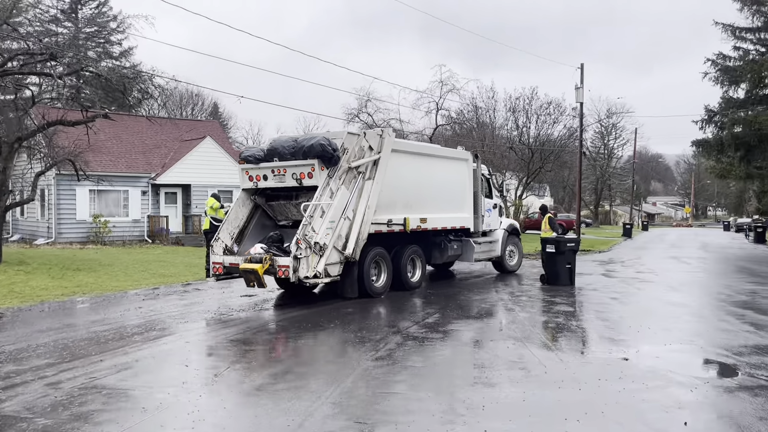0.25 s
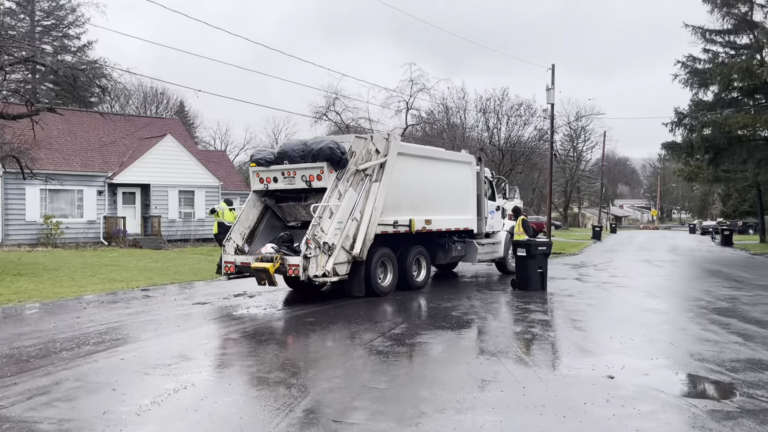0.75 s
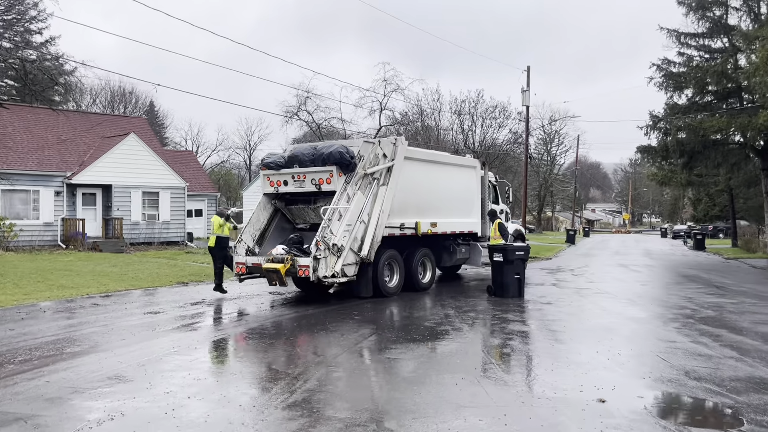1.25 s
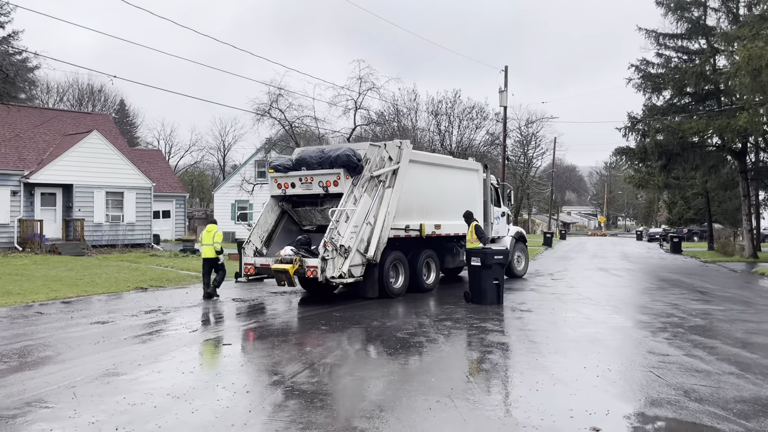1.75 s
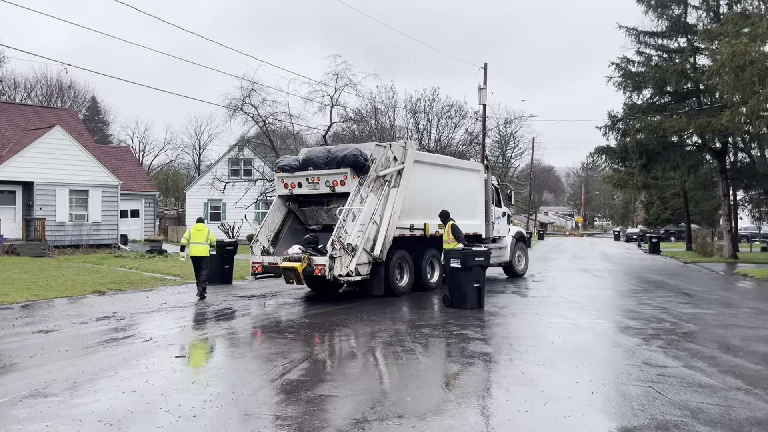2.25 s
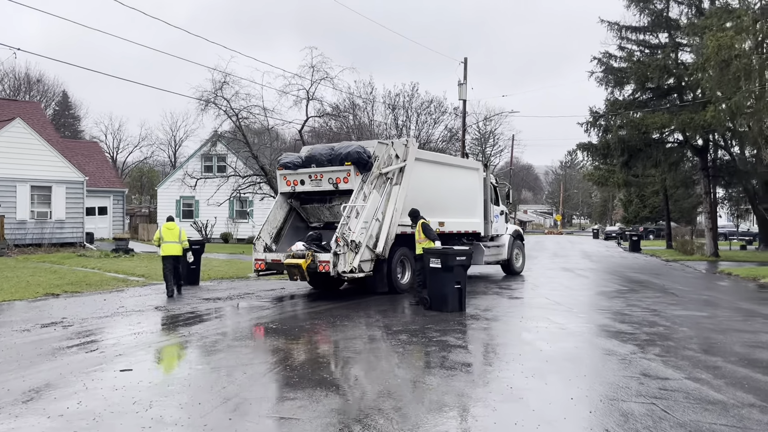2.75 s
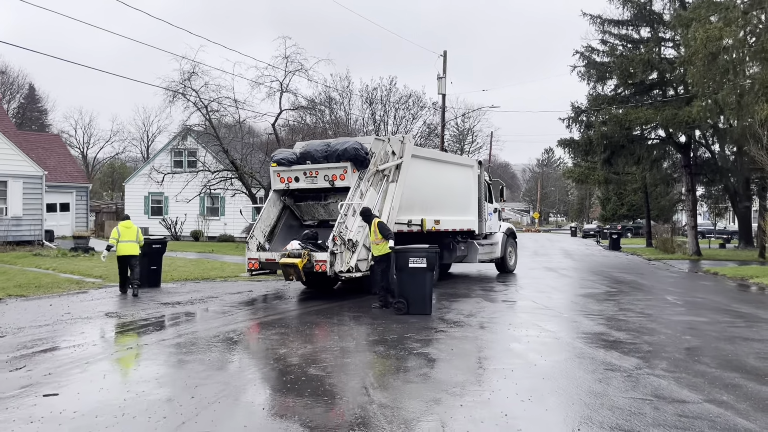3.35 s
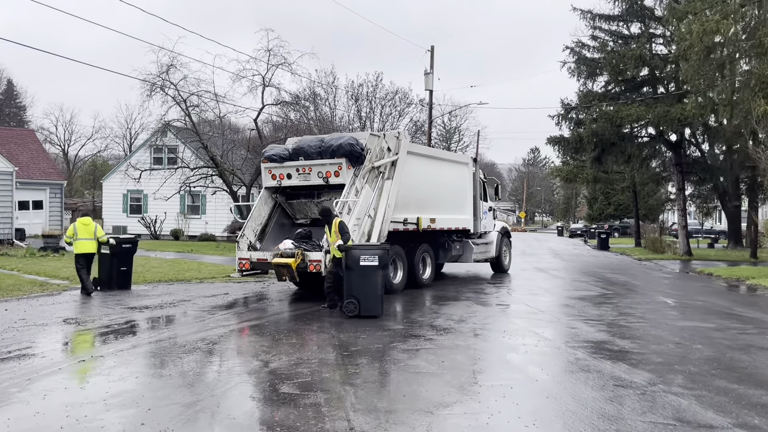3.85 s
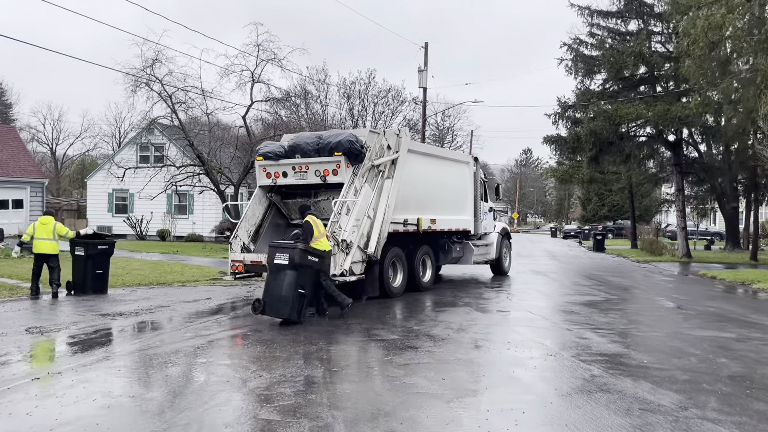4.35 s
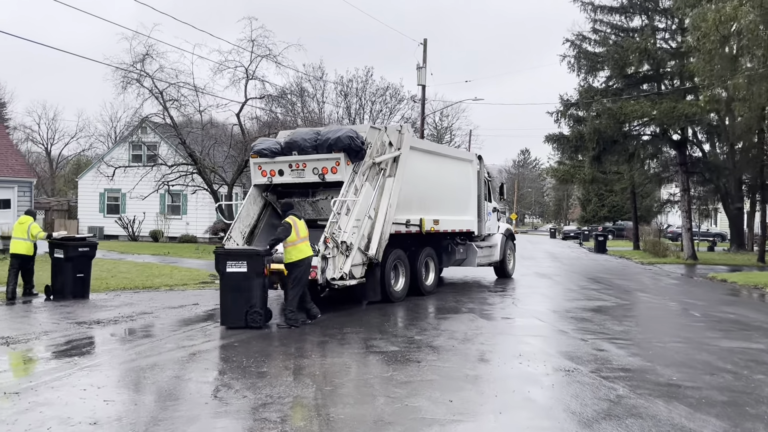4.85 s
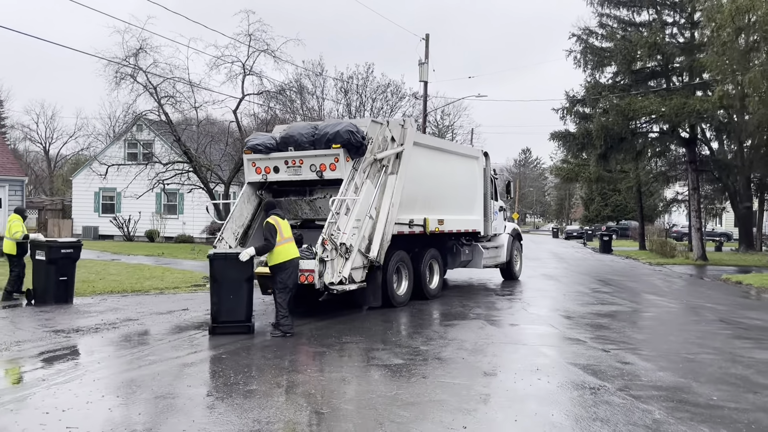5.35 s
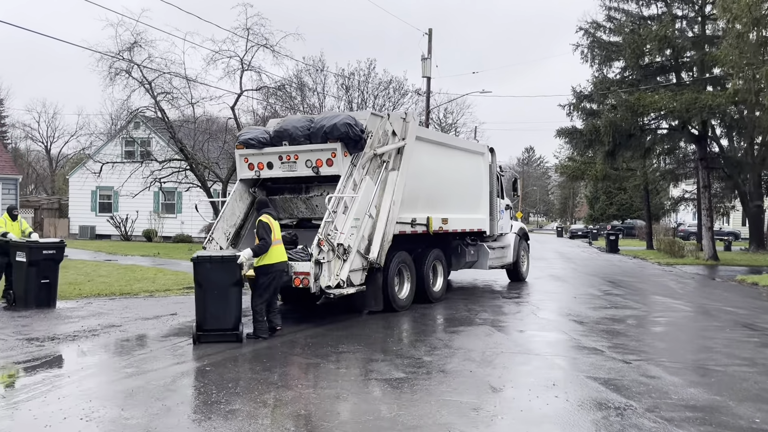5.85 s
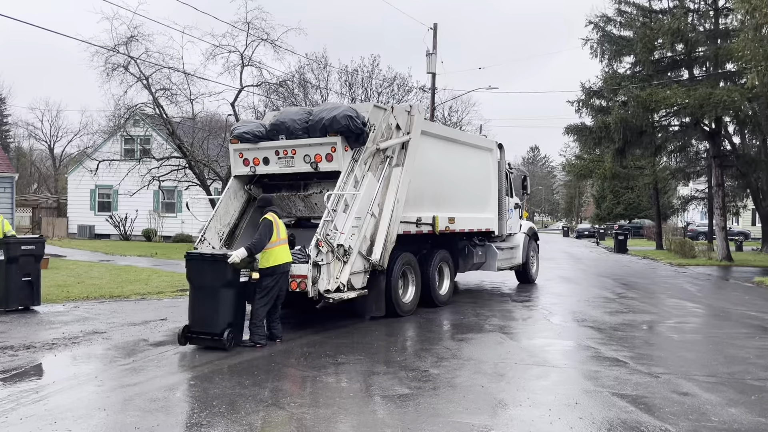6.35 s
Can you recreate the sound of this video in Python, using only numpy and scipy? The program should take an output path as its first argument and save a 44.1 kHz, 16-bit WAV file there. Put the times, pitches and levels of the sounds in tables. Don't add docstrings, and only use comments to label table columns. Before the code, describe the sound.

On a wet residential street a heavy diesel truck rumbles steadily while plastic wheeled bins roll over rough asphalt. Brief brake chirps thicken into piercing, overlapping squeals with a low groan underneath. A bin is scraped and knocked hard as the squealing ends, then air bursts from the brakes and hisses away. Outdoor stereo phone pickup from across the road, with a light street echo.

```python
import sys
import numpy as np
from scipy import signal
from scipy.fft import rfft, irfft, next_fast_len
from scipy.io import wavfile

SR = 44100
rng = np.random.default_rng(int(sys.argv[2]) if len(sys.argv) > 2 else 0)


def convert_level_to_amplitude(level_db):
    exponent = np.asarray(level_db, float) / 20
    return 10 ** exponent


def store_pcm(level_fs):
    pcm = np.round(np.clip(level_fs, -1, 1) * 32767).astype(np.int16)
    wavfile.write(sys.argv[1], SR, np.atleast_2d(pcm).T)


N = 291942
TIME = np.arange(N) / SR
SIZE = next_fast_len(N, True)
HZ = np.fft.rfftfreq(SIZE, 1 / SR)

# start_s, level_db [rms]
ENGINE_LEVEL = [(0, -34), (0.6, -33.5), (1.2, -36), (2.0, -39.5), (2.7, -38.5), (3.2, -36), (3.9, -36),
                (4.3, -35.5), (4.7, -31.5), (5.4, -35), (6.62, -33.5)]
# freq_hz, level_db [per Hz]
ENGINE_BODY = [(30, 2), (211, -1.5), (300, -7), (351, 3), (469, -4), (730, -11), (940, -7), (1200, -14),
               (1370, -7), (1600, -13), (1780, -10), (1980, -15.5), (2890, -17.5), (5140, -27.5),
               (6000, -31.5), (7800, -31), (13200, -120)]
# pitch_hz, level_db [re engine]
ENGINE_TONES = [(360, -14), (545, -30), (985, -17), (1800, -19)]
# pitch_hz, level_db, t60_s
BIN_BOOM = [(65, -15, 0.25), (80.5, 3, 0.19), (98, 6, 0.079), (134.7, 1.5, .1), (169.5, 2.5, 0.084)]
# pitch_hz, level_db, t60_s
BIN_WALL = [(189.5, -.4, 0.097), (251, .6, 0.059), (307, 0.5, 0.046), (355, -4, 0.078), (435, -1.5, 0.053),
            (512, 1.5, 0.05), (568, .2, 0.042), (650, -3, 0.024), (787, 1, 0.013), (944, 2, 0.014),
            (1450, -7, 0.036), (2100, -42, 0.012)]
# start_s, fastest_s, end_s, boom_db, rattle_db
PUSHES = [(-.3, 0, .5, -29, -24), (.08, .55, 1.05, -23, -30), (.8, 1.2, 1.5, -29, -29),
          (1.3, 1.8, 2.1, -22, -29), (1.9, 2.4, 3.1, -41, -35), (3.0, 3.32, 3.62, -28, -34),
          (3.35, 3.9, 4.4, -27, -21.5), (4.15, 4.5, 4.8, -28, -27), (4.66, 4.88, 5.2, -19, -24),
          (4.9, 5.25, 5.52, -21, -25), (5.35, 5.6, 6.0, -28, -24.5), (5.75, 6.15, 6.5, -28, -28),
          (6.3, 6.62, 6.9, -22.5, -32)]
# start_s, wall_db [peak], boom_db
BUMPS = [(0.573, -20, -28), (1.106, -28, -9), (1.487, -30, -8), (1.597, -28, -10), (3.586, -21, -30),
         (3.615, -19, -30), (3.756, -20, -30), (3.856, -15, -30), (3.925, -18, -30), (3.962, -18, -30),
         (4.076, -16, -30), (4.16, -21, -30), (4.206, -18, -28), (4.797, -12.5, -8), (4.811, -13, -3),
         (4.841, -7.5, -8), (4.866, -15, -14), (4.953, -15, -20), (5.014, -5.5, -24), (5.035, -9.5, -4.5),
         (5.059, -17, -9), (5.098, -8, -12), (5.181, -18, -24), (5.207, -16, -14), (5.246, -12, -21),
         (5.272, -19, -25), (5.298, -12.5, -12), (5.318, -20, -25), (5.341, -21, -19), (5.48, -13, -33),
         (6.149, -24, -8.5), (6.533, -22, -25), (6.557, -8, -21)]
# start_s, level_db
TICKS = [(.14, -39), (.472, -46), (.61, -48), (2.075, -42), (4.134, -44), (4.932, -27.5), (4.953, -33),
         (5.015, -33), (5.134, -34), (5.173, -33), (5.482, -38)]
# start_s, length_s, level_db [rms]
SCRAPES = [
    (0.123, 0.044, -47),
    (2.93, 0.27, -42),
    (3.36, .3, -46),
    (3.76, .36, -47),
    (4.494, 0.17, -35.5),
    (4.637, .15, -42),
    (4.816, 0.046, -33),
    (4.91, 0.16, -36.5),
]
# freq_hz, level_db [per Hz]
SCRAPE_COLOUR = [(1200, -18), (2500, 8), (4000, 0), (7000, 3), (11000, 5), (15700, -31)]
# freq_hz, level_db [per Hz]
JET_LOW = [(700, -10.5), (1200, -7.5), (2000, -6), (3000, -0.5), (4500, 0), (6000, -2.5), (8000, -11)]
# freq_hz, level_db [per Hz]
JET_HIGH = [(4500, -23), (6500, -9.5), (8700, -6), (11000, -5), (13500, -9), (15700, -9)]
# start_s, level_db [rms]
RUB_LEVEL = [(0, -54), (1.2, -56.5), (2.3, -57), (2.6, -54.5), (3.2, -56), (3.8, -51), (4.2, -54),
             (4.45, -50), (5.1, -61), (5.55, -55)]
# freq_hz, level_db [per Hz]
RUB_COLOUR = [(2000, -6), (3500, 0), (6000, -3), (9000, -4), (10500, -9), (13000, -10), (15700, -13)]
# start_s, noisy_share [0-1], line_width_hz
GRIP = [(0, .75, 70), (2.4, .75, 80), (2.66, .85, 130), (2.78, .4, 80), (3.1, .5, 90), (3.4, .35, 70),
        (4.0, .18, 45), (4.7, .2, 45), (5.0, .6, 70)]
# start_s, pitch_hz, level_db [rms]
GROAN = [
    (3.02, 134, -34),
    (3.362, 136.7, -27),
    (3.74, 136.5, -30),
]
# start_s, length_s, pitch_hz, level_db [rms]
SQUEAKS = [(.25, .12, 11750, -55), (.42, .1, 14300, -44), (.69, .08, 14000, -50), (.96, .12, 7300, -40),
           (1.38, .08, 14250, -48), (1.64, .1, 7800, -38), (1.84, .1, 13100, -47), (1.84, .1, 13850, -50),
           (2.55, .1, 9750, -42), (2.66, .1, 11660, -42), (3.27, .55, 3690, -45), (3.83, .24, 3964, -43),
           (4.1, .25, 3703, -48), (5.2, .3, 10350, -55), (2.88, .22, 4580, -48), (2.94, .15, 9720, -43),
           (3.13, .22, 9940, -45), (2.82, .25, 11550, -46), (3.3, .75, 4780, -50), (3.45, .45, 5420, -53),
           (4.3, .5, 10040, -52), (2.76, .08, 5660, -33), (2.45, .08, 5870, -44), (2.43, .12, 7480, -42),
           (2.65, .1, 4000, -48), (3.5, .35, 14600, -48), (4.84, .1, 11360, -50), (1.66, .1, 13500, -51),
           (.45, .05, 13600, -50)]
# start_s, loudest_s, end_s, pitch_hz, level_db [rms]
CHIRPS = [(.32, .41, .5, 9170, -30), (.53, .56, .66, 7760, -37), (.68, .78, .9, 7800, -44),
          (.69, .75, .83, 9070, -37), (.8, 1.0, 1.3, 7670, -34), (1.18, 1.35, 1.75, 9210, -34),
          (1.22, 1.45, 1.76, 9280, -42), (1.6, 1.85, 2.08, 9080, -42), (1.72, 1.76, 1.92, 7450, -38),
          (1.86, 2.02, 2.11, 7350, -33), (1.96, 2.16, 2.36, 7710, -36), (2.12, 2.31, 2.47, 9220, -35),
          (2.26, 2.43, 2.5, 7800, -33), (2.34, 2.5, 2.6, 6540, -36), (2.42, 2.47, 2.6, 8050, -30),
          (2.46, 2.6, 2.72, 6600, -28), (2.45, 2.58, 2.7, 8910, -32), (2.55, 2.59, 2.66, 6725, -30)]
# start_s, loudest_s, end_s, pitch_hz, level_db [rms]
BITE = [(2.58, 2.8, 3.2, 8750, -20), (2.6, 2.77, 2.95, 8030, -32), (2.63, 2.67, 2.77, 6340, -29),
        (2.745, 2.79, 3.1, 6460, -24), (2.72, 2.95, 3.25, 5670, -45), (2.74, 2.78, 2.91, 8970, -25),
        (2.72, 2.88, 3.16, 8380, -24), (2.88, 3.03, 3.1, 8100, -31), (2.95, 3.17, 3.36, 6420, -31),
        (2.98, 3.15, 3.42, 6270, -40), (3.04, 3.1, 3.2, 9010, -35), (3.1, 3.25, 3.45, 6930, -37),
        (3.15, 3.3, 3.52, 8950, -37), (3.18, 3.37, 3.58, 6750, -26), (3.2, 3.5, 3.68, 7490, -38),
        (3.22, 3.25, 3.36, 8670, -29), (3.27, 3.38, 3.62, 8390, -32), (3.35, 3.41, 3.48, 8900, -34)]
# start_s, loudest_s, end_s, pitch_hz, level_db [rms]
HALT = [(3.22, 3.4, 3.6, 7920, -22), (3.3, 3.55, 3.75, 6280, -35), (3.4, 3.63, 3.95, 6950, -31),
        (3.52, 3.56, 3.63, 9060, -27), (3.56, 3.76, 3.87, 6665, -26), (3.52, 3.65, 3.82, 5730, -40),
        (3.55, 3.68, 4.0, 8360, -21), (3.64, 4.05, 4.6, 7830, -30), (3.66, 3.82, 4.08, 6380, -28),
        (3.72, 3.85, 4.15, 7930, -27), (4.25, 4.6, 4.8, 5630, -43), (3.9, 4.25, 4.65, 9030, -25),
        (3.82, 3.92, 4.01, 7670, -36), (3.85, 4.05, 4.4, 6950, -34), (3.86, 4.1, 4.55, 6275, -40),
        (4.04, 4.15, 4.3, 8405, -25), (4.2, 4.35, 4.8, 7900, -28), (4.25, 4.58, 4.8, 6970, -36),
        (4.5, 4.7, 4.88, 6310, -36), (4.72, 4.83, 4.96, 5650, -30), (4.43, 4.65, 4.8, 4860, -37),
        (4.58, 4.68, 4.8, 8940, -26), (4.78, 4.88, 5.03, 9030, -28), (4.77, 4.92, 5.02, 8580, -38)]
# start_s, loudest_s, end_s, pitch_hz, level_db [rms]
OVERTONES = [(2.47, 2.51, 2.56, 13050, -45), (2.55, 2.62, 2.68, 13190, -42), (2.55, 2.62, 2.7, 13500, -47),
             (2.47, 2.5, 2.56, 12370, -50), (2.55, 2.6, 2.66, 12480, -51), (2.64, 2.72, 2.8, 11300, -50),
             (2.76, 2.98, 3.08, 12970, -45), (3.04, 3.1, 3.34, 12800, -46), (3.06, 3.1, 3.14, 11720, -43),
             (2.93, 3.05, 3.2, 14850, -48), (3.08, 3.3, 3.5, 13500, -44), (3.22, 3.36, 3.48, 12520, -45),
             (3.1, 3.3, 3.45, 13870, -51), (3.48, 3.7, 3.86, 13340, -41), (3.55, 3.7, 3.8, 13530, -47),
             (3.5, 3.66, 3.76, 12010, -48), (3.48, 3.9, 4.45, 13890, -48), (3.74, 3.82, 3.92, 12770, -43),
             (3.88, 3.94, 4.0, 12870, -49), (3.76, 4.06, 4.22, 11910, -45), (3.85, 4.3, 4.56, 12550, -44),
             (4.5, 4.66, 4.76, 12620, -47), (3.78, 4.05, 4.12, 9800, -51), (4.27, 4.32, 4.4, 9850, -49),
             (4.5, 4.78, 4.9, 11280, -46), (3.52, 3.57, 3.63, 15000, -46), (.97, 1.02, 1.08, 14600, -46),
             (1.06, 1.09, 1.13, 9850, -50), (1.67, 1.7, 1.74, 9950, -48), (2.26, 2.33, 2.42, 13600, -50)]
# start_s, loudest_s, end_s, pitch_hz, level_db [rms]
BRIEF = [(.64, .72, .8, 5950, -49), (.08, .13, .2, 7150, -50), (1.65, 1.71, 1.78, 5650, -48),
         (3.82, 3.87, 3.94, 2700, -47), (3.8, 3.95, 4.12, 5620, -45), (4.0, 4.2, 4.45, 4830, -52),
         (3.35, 3.5, 3.65, 4950, -52), (4.74, 4.82, 4.86, 6500, -41), (4.88, 4.94, 4.98, 6450, -39),
         (3.3, 3.55, 3.78, 9350, -42), (3.66, 3.74, 3.82, 9010, -30), (3.58, 3.64, 3.72, 7920, -24),
         (2.62, 2.72, 2.82, 7450, -42), (2.98, 3.02, 3.09, 7120, -42)]
# freq_hz, left_lead_rad, direct_share [0-1]
PORTS = [(0, 0, .93), (520, 0, .93), (1250, 1.4, .86), (1580, 2.2, .8), (1800, 0, .8), (2300, 0, .88),
         (3000, .6, .82), (4600, .8, .75), (5450, -.7, .8), (6300, -.95, .86), (7500, -2.2, .9),
         (7950, -2.85, .98), (8250, -3.14, .99), (8600, -3.3, .99), (9200, -3.9, .93), (11200, -6.1, .9),
         (11500, -6.28, .99), (12400, -6.28, .99), (14200, -7.9, .9), (15000, -9.42, .996),
         (16000, -9.42, .996)]
# freq_hz, left_minus_right_db
BALANCE = [(0, 1), (520, -1.5), (1250, 1.5), (1850, 0), (3000, 2), (5400, 0), (6400, 1.5), (7500, 0)]


def rms_one(x):
    return x / np.sqrt(np.mean(np.abs(x) ** 2) + 1e-20)


def in_time(rows, t=TIME):
    s, *columns = np.transpose(rows)
    return [np.interp(t, s, column) for column in columns]


def drift(hz, size=N):
    points = rng.standard_normal(int(size * 40 / SR) + 2)
    place = np.arange(size) * min(hz, 40) / SR
    return np.interp(place, np.arange(len(points)), points) * 1.206


def coloured(x, spectrum):
    hz, db = np.transpose(spectrum)
    gain = convert_level_to_amplitude(np.interp(np.log(HZ + 1), np.log(hz), db, left=-90, right=-90))
    return rms_one(irfft(rfft(x, SIZE) * gain, SIZE)[:N])


def noise(spectrum, patchy_db):
    bins = rfft(coloured(rng.standard_normal(N), spectrum), SIZE)
    octave = np.log2(HZ + 1)
    lowest = max(5, int(np.log2(spectrum[0][0])))
    out = 0
    for centre in range(lowest, 15):
        flicker = 1 + np.log(convert_level_to_amplitude(patchy_db)) * drift(9)
        band = np.clip(1 - np.abs(octave - centre), 0, 1)
        out = out + irfft(bins * band, SIZE)[:N] * flicker
    return rms_one(out)


def ring(clicks, hz, t60):
    r, w = convert_level_to_amplitude(-60 / (t60 * SR)), 2 * np.pi * hz / SR
    return signal.lfilter([0, np.sin(w)], [1, -2 * r * np.cos(w), r * r], clicks + 1e-18)


def swell(start, top, end, t):
    rise, fall = max(top - start, .01), max(end - top, .01)
    return np.where(t < top, (t - top) / rise, (t - top) / fall)


def engine():
    firing_hz = 56.78
    turn = 2 * np.pi * np.cumsum(firing_hz * (1 + 0.03044 * drift(2))) / SR
    pump = 1 + 0.19 * np.cos(turn) + 0.045 * np.cos(turn / 3)
    out = noise(ENGINE_BODY, patchy_db=.5) * pump
    for hz, db in ENGINE_TONES:
        level = convert_level_to_amplitude(db + drift(2.95))
        pitch = hz * (1 + 0.00563 * drift(3))
        out = out + level * np.cos(2 * np.pi * np.cumsum(pitch) / SR)
    return convert_level_to_amplitude(in_time(ENGINE_LEVEL)[0] + 3.5) * out


def shaken(modes, per_s, spread_db):
    count = round(per_s * N / SR)
    when = (rng.random(count) * N).astype(int)
    size = convert_level_to_amplitude(spread_db * np.minimum(rng.exponential(1, count), 4))
    out, jolts = 0, np.zeros(N)
    for hz, db, t60 in modes:
        jolts[when] = size * rng.standard_normal(count)
        out = out + convert_level_to_amplitude(db) * ring(jolts, hz, t60)
    return rms_one(out)


def rolling():
    edge_db = 10.
    t = TIME[::64]
    boom_power, rattle_power = 0, 0
    for start, top, end, boom_db, rattle_db in PUSHES:
        loss_db = edge_db * swell(start, top, end, t) ** 2
        boom_power = boom_power + convert_level_to_amplitude(boom_db - loss_db) ** 2
        rattle_power = rattle_power + convert_level_to_amplitude(rattle_db - loss_db) ** 2
    boom = np.interp(TIME, t, np.sqrt(boom_power))
    rattle = np.interp(TIME, t, np.sqrt(rattle_power))
    body = convert_level_to_amplitude(-1.5) * boom * shaken(BIN_BOOM, per_s=160.0, spread_db=2.0)
    return body + convert_level_to_amplitude(-1) * rattle * shaken(BIN_WALL, per_s=590.0, spread_db=1.7)


def bumps():
    chatter_s, push_s = 0.0039, 0.0087
    s, wall_db, boom_db = np.transpose(BUMPS)
    when = (s * SR).astype(int)
    knocks, thumps = np.zeros((2, N))
    knocks[when] = convert_level_to_amplitude(wall_db - 20)
    thumps[when] = convert_level_to_amplitude(boom_db)
    pole = np.exp(-1 / (chatter_s * SR))
    chatter = signal.lfilter([3 * (1 - pole)], [1, -2 * pole, pole ** 2], knocks)
    strength = 0.41 * chatter + 2.5 * knocks
    out = np.zeros(N)
    for hz, db, t60 in BIN_WALL:
        out += convert_level_to_amplitude(db) * ring(strength * rng.standard_normal(N), hz, 0.54 * t60)
    soft = np.hanning(round(push_s * SR))
    push = np.convolve(thumps, soft / soft.sum())[:N]
    for hz, db, t60 in BIN_BOOM:
        out += convert_level_to_amplitude(db - 10.5) * ring(push, hz, 1.7 * t60)
    return out


def ticks():
    decay_s = 0.0087
    gate = np.zeros(N)
    for s, db in TICKS:
        gate += convert_level_to_amplitude(db) * np.exp(-np.clip(TIME - s, 0, 1) / decay_s) * (TIME > s)
    return gate * coloured(rng.standard_normal(N), RUB_COLOUR)


def scrapes():
    stroke = np.zeros(N)
    for s, length, db in SCRAPES:
        start, size = round(s * SR), round(length * SR)
        stroke[start:start + size] += convert_level_to_amplitude(db) * np.sin(np.pi * np.arange(size) / size)
    grit = rng.standard_normal(N) * convert_level_to_amplitude(2.1 * drift(40))
    return stroke * coloured(grit, SCRAPE_COLOUR)


def vent():
    valve_s, open_s, shut_db = 5.53, .04, -32.
    since = np.clip(TIME - valve_s - open_s, 0, None)
    puff = np.exp(-since / .03)
    valve = (TIME > valve_s) * convert_level_to_amplitude(shut_db * np.clip(1 - (TIME - valve_s) / open_s, 0, 1))
    low_db = -22.5 + 0.1 * puff - 1.2 * since - 8.5 * since ** 2
    high_db = -22.5 + 3. * puff - 2.2 * since - 4.5 * since ** 2
    low = convert_level_to_amplitude(low_db + 3.5) * noise(JET_LOW, patchy_db=0.2)
    high = convert_level_to_amplitude(high_db + 6) * noise(JET_HIGH, patchy_db=-0.2)
    return valve * (low + high)


def rub():
    moving = TIME < RUB_LEVEL[-1][0]
    return convert_level_to_amplitude(in_time(RUB_LEVEL)[0] + 9) * moving * noise(RUB_COLOUR, patchy_db=-0.5)


def cry(start, top, end, hz, db):
    edge_db, waver_db = 10., 2.5
    soften_per_db, bend = .0005, .001
    last_grab_s, rise_per_s = 4.76, .075
    t = np.linspace(start, end, 9)
    bends, wavers = rng.standard_normal((2, 9))
    loss_db = edge_db * swell(start, top, end, t) ** 2 + waver_db * wavers
    rise = rise_per_s * np.clip(t - last_grab_s, 0, 1)
    pitch = hz * (1 + soften_per_db * loss_db + bend * bends + rise)
    return np.transpose([t, pitch, db - loss_db])


def sing(rows, fade_s=0.024, widen=1.):
    start = round((rows[0][0] - fade_s) * SR)
    stop = min(round((rows[-1][0] + fade_s) * SR), N)
    t = TIME[start:stop]
    hz, db = in_time(rows, t)
    share, width_hz = in_time(GRIP, t)
    share = np.clip(share * hz / 8500, .04, 1)
    step = np.cumsum(2 * widen * width_hz / SR)
    knots = rng.standard_normal((2, 400))
    real, imag = [np.interp(step, np.arange(400), k) * .87 for k in knots]
    swing = np.sqrt(1 - share) + np.sqrt(share) * (real + 1j * imag)
    fade = np.clip(np.minimum(t - t[0], t[-1] - t) / (2 * fade_s), 0, 1) ** 2
    carrier = np.exp(2j * np.pi * np.cumsum(hz) / SR)
    return start, stop, np.sqrt(2) * convert_level_to_amplitude(db) * fade * np.real(swing * carrier)


def groan():
    out = np.zeros(N)
    start, stop, tone = sing(GROAN, fade_s=.08, widen=.06)
    out[start:stop] += tone
    return out


def overtones():
    out = np.zeros(N)
    for row in OVERTONES + BRIEF:
        start, stop, tone = sing(cry(*row), widen=.9)
        out[start:stop] += convert_level_to_amplitude(-2) * tone
    return out


def squeals():
    out = np.zeros(N)
    paths = [cry(*row) for row in CHIRPS + BITE + HALT]
    paths += [[(s, hz, db), (s + length, hz, db)] for s, length, hz, db in SQUEAKS]
    for path in paths:
        start, stop, tone = sing(path)
        out[start:stop] += tone
    return out


def scene():
    street_t60_s = 0.37
    drum_scatter = .05
    size = next_fast_len(N + SR // 2, True)
    hz = np.fft.rfftfreq(size, 1 / SR)
    others = rfft(engine() + rolling() + bumps() + ticks() + scrapes() + vent(), size)
    brakes = rfft(rub() + groan() + overtones() + squeals(), size)
    lead, direct = in_time(PORTS, hz)
    balance_db = in_time(BALANCE, hz)[0]
    tail = rng.standard_normal((2, N)) * convert_level_to_amplitude(-60 * TIME / street_t60_s)
    scatter = rfft(tail / np.sqrt(np.sum(tail ** 2, axis=1, keepdims=True)), size)
    side = np.array([[.5], [-.5]])
    ports = np.sqrt(direct) * np.exp(1j * side * lead) + np.sqrt(1 - direct) * scatter
    heard = (others + brakes) * ports
    heard = heard + np.sqrt(drum_scatter) * brakes * scatter[::-1]
    return irfft(heard * convert_level_to_amplitude(side * balance_db), size)[:, :N]


def band_limit(x):
    return signal.sosfilt(signal.butter(12, 15710, fs=SR, output="sos"), x)


def record(dry):
    low_cut = signal.butter(3, 51., "high", fs=SR, output="sos")
    cut = signal.sosfilt(low_cut, dry)
    mix = 1.1 * np.tanh(cut / 1.1)
    return band_limit(mix)


dry = scene()
out = record(dry)
store_pcm(out)
```